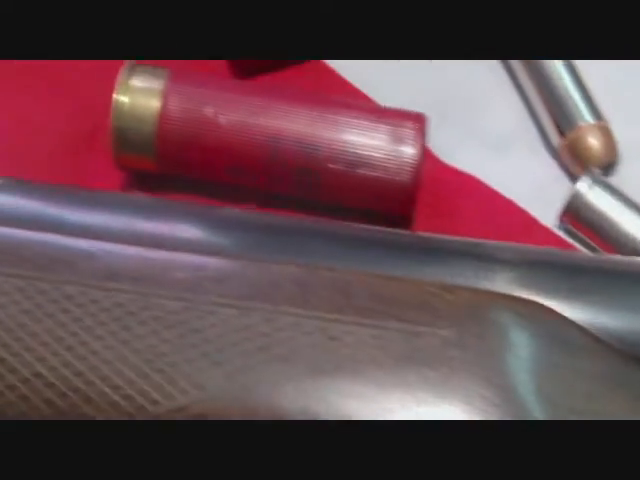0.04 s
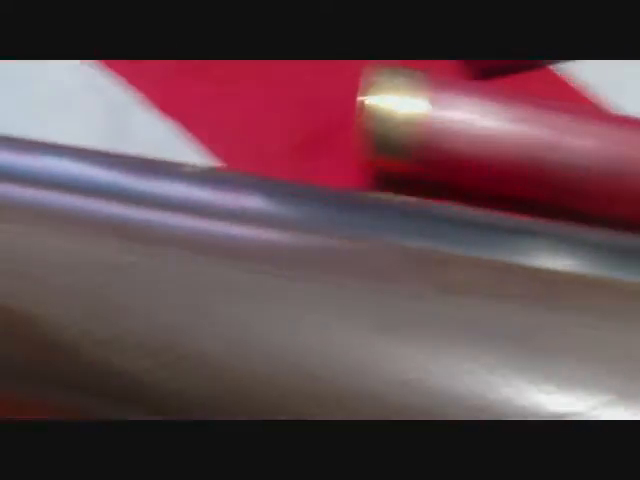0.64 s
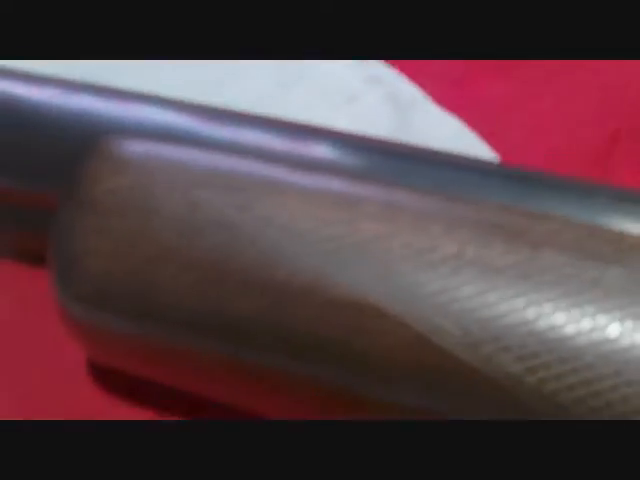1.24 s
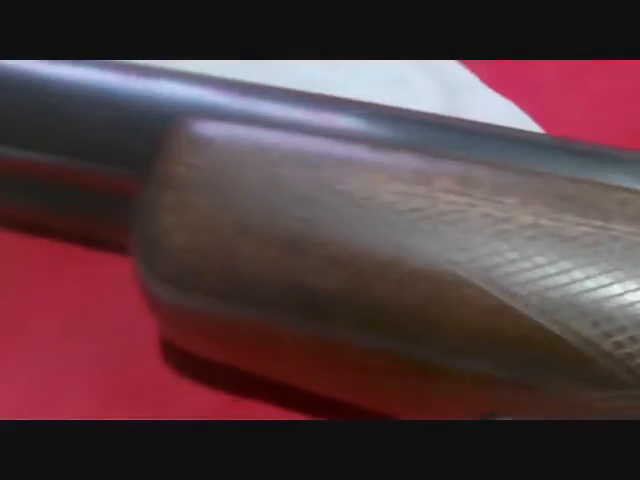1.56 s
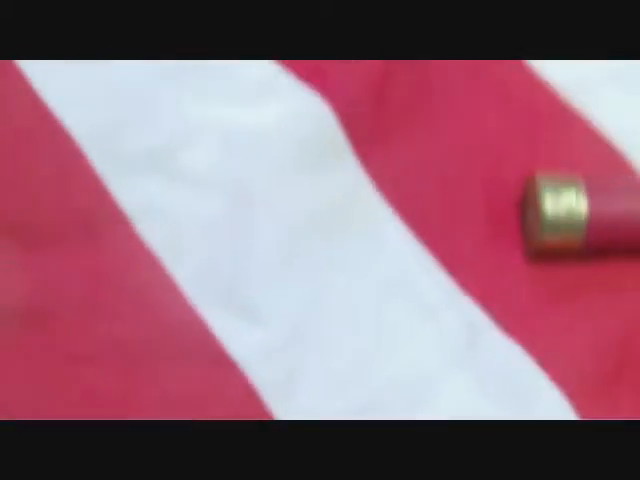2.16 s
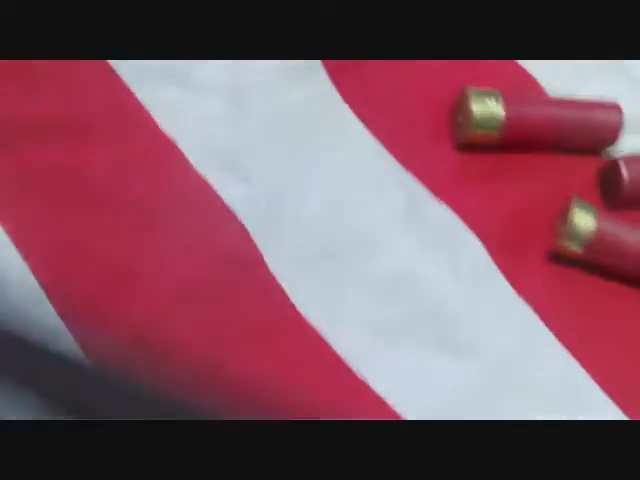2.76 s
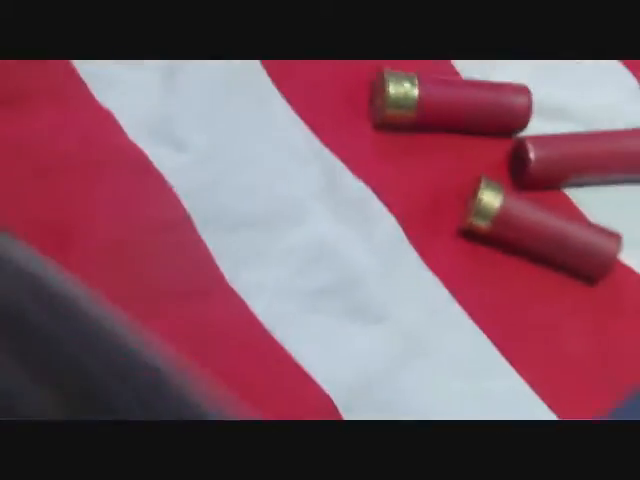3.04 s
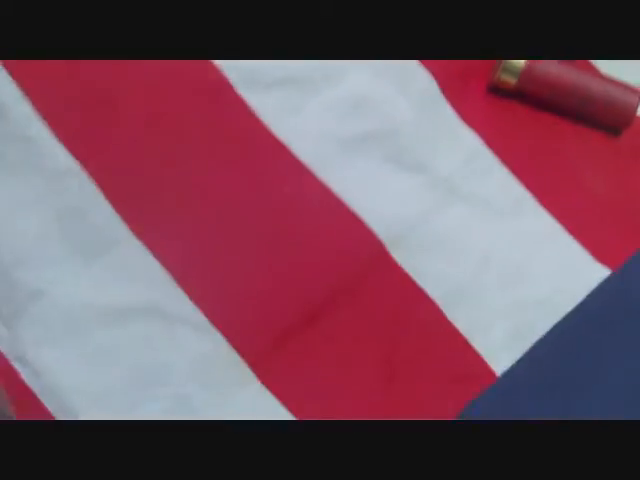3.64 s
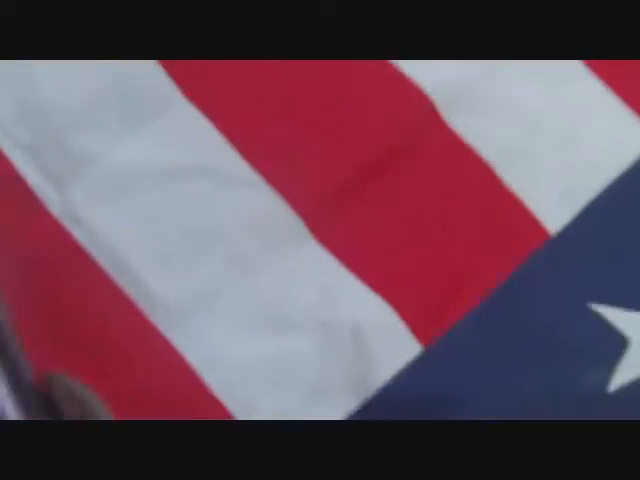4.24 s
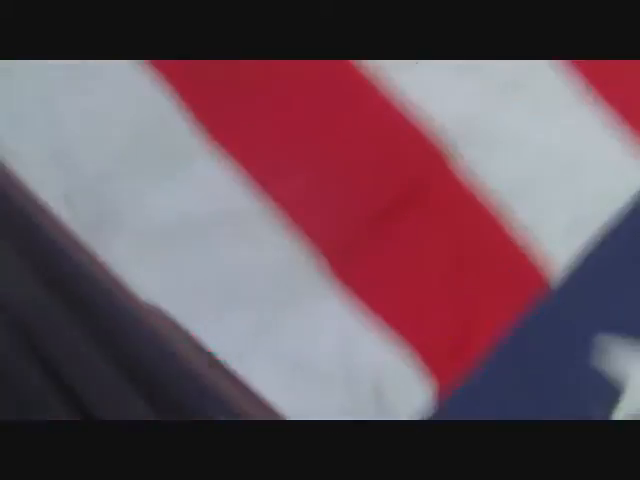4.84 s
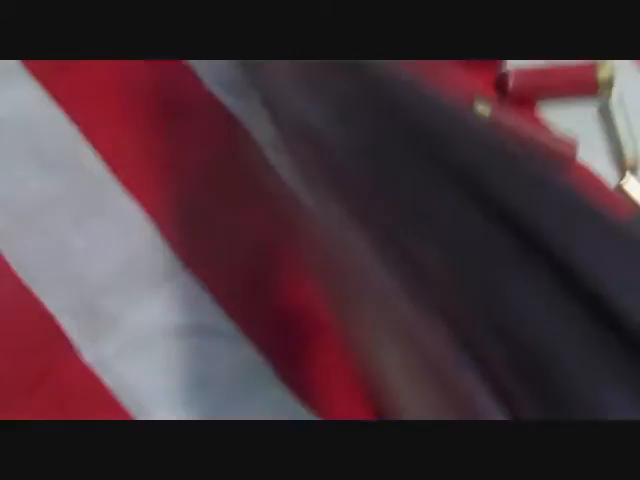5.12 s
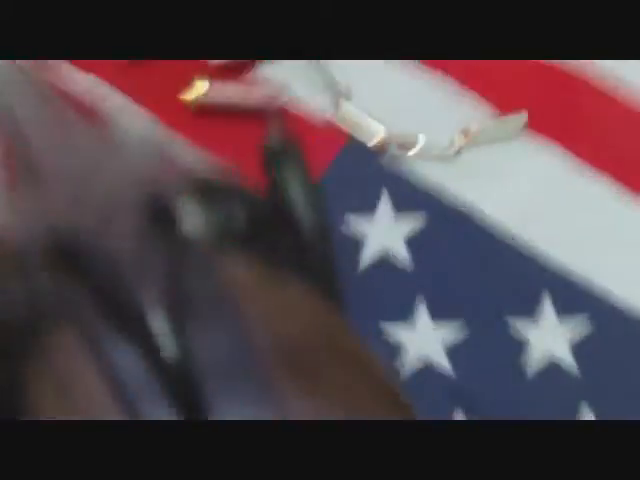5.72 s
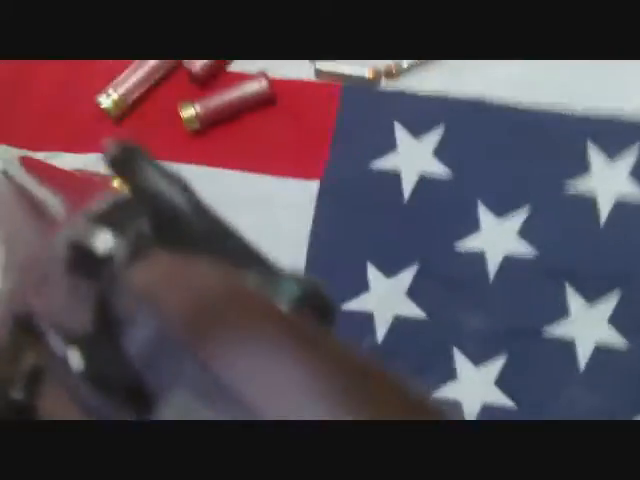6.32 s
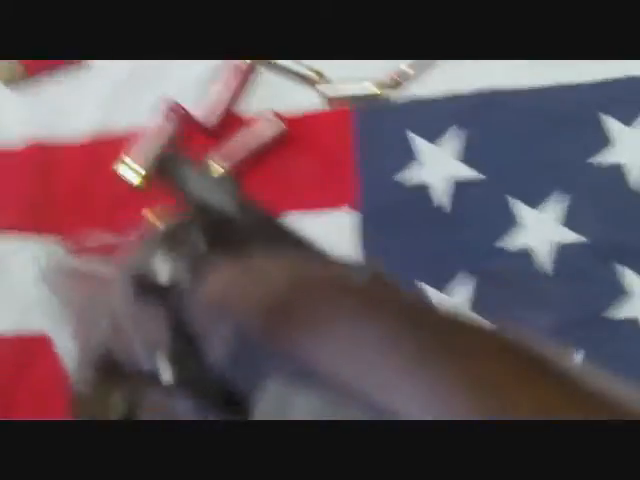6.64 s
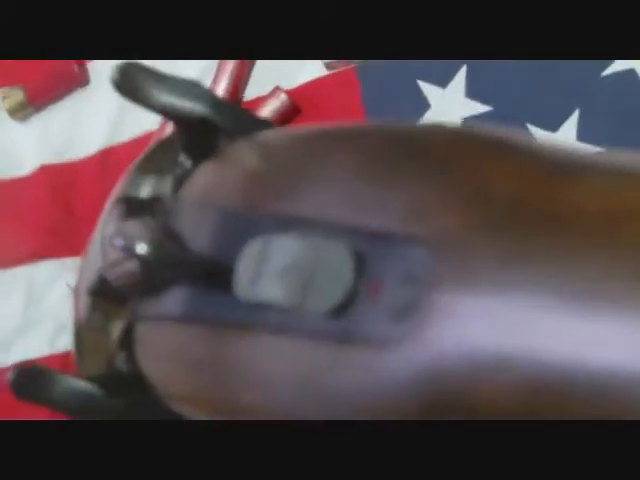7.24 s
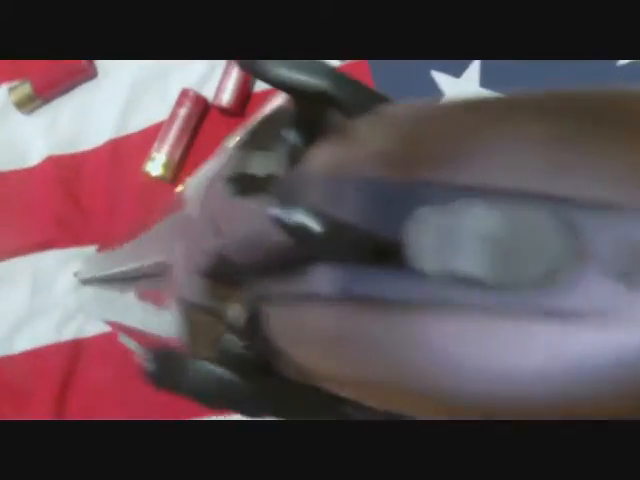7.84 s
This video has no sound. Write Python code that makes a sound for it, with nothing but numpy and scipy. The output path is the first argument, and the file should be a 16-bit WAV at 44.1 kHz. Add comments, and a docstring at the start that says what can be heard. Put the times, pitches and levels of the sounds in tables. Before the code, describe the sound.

A faint steady hiss runs throughout in a small, quiet room. Close to the microphone, hands and sleeves rub softly over a double-barrel shotgun and cloth, briefly near 0.7 seconds and more often from 1.6 seconds. At 2.2 seconds a spring catch snaps with a thin, bright click, followed by light finger ticks. At about 3.4 seconds the action opens with a loud, sharp clunk, trailed by a few small clicks. Metal knocks start again around 4.2 seconds and build to the loudest moment near 4.4 seconds, a quick cluster of clacks with a short steel grind and slight thump as the gun shuts. The barrels ring faintly, with little room echo. Another sharp click comes at 5 seconds, then lighter knocks and taps until about 6 seconds. Only faint rubbing and a couple of tiny ticks remain, up to about 8 seconds.

```python
"""A steady hiss fills a small quiet room, and hands and sleeves rub softly over wood and cloth.
A double-barrel shotgun is being turned over close by, above a cloth-covered table. Fingers tick on it,
a sprung catch snaps, and the action clunks open and, a second later, clacks shut with a grind of steel.
Each impact of the action or of loose parts excites a crack and the gun's hand-damped modes, and the
barrels ring on faintly. The table and walls add quick reflections and a weak reverberant tail."""
import sys
import numpy as np
from scipy import signal
from scipy.fft import rfft, irfft
from scipy.io import wavfile
from scipy.ndimage import uniform_filter1d, minimum_filter1d

SR = 44100
rng = np.random.default_rng(int(sys.argv[2]) if len(sys.argv) > 2 else 0)


def generate_wav(signal):
    """Clip the signal to [-1, 1] and save it as 16-bit WAV at the path in sys.argv[1]."""
    frames = np.transpose(np.atleast_2d(signal))
    scaled = np.clip(frames, -1, 1) * 32767
    pcm = np.round(scaled).astype(np.int16)
    wavfile.write(sys.argv[1], SR, pcm)


N = 351918

# spectral density of the background hiss: f/Hz, level/dB
BACKGROUND_SPECTRUM = [(30, -37), (90, -33), (150, -19.5), (230, -13), (430, -5.5), (620, -3), (1230, -5.5),
                       (2200, -9.5), (3500, -13.5), (4800, -16.5), (7000, -21), (8200, -22.5),
                       (12000, -24.5), (15500, -29)]
# reverberation time of the room: f/Hz, t60/s
REVERB_TIMES = [(100, .45), (700, .42), (2500, .33), (6000, 0.52), (13000, .24)]
# spectral density of skin and cloth rubbing: f/Hz, level/dB
RUB_SPECTRUM = [(150, -32), (400, -4), (800, -1.5), (1600, -2), (2250, -2.5), (2530, 2.5), (2850, -4),
                (4000, -5), (6000, -13.5), (10000, -49)]
# spectral density of the fibres' hiss: f/Hz, level/dB
FIBRE_SPECTRUM = [(1500, -31.5), (3500, -5.5), (5000, -3.5), (6700, 0), (8000, -2.5), (10000, -3.5),
                  (12500, -8.5), (15000, -16)]
# strokes of hands and sleeves: middle t/s, half length/s, rub level/dB, fibre level/dB
HAND_STROKES = [(0.68, 0.068, -63, -68.5), (1.62, 0.049, -58.5, -70), (1.76, 0.16, -59, -65),
                (2.076, 0.064, -57.5, -62), (2.24, 0.1, -63, -62), (2.45, 0.12, -65.5, -71),
                (2.84, 0.07, -56, -57), (3.084, 0.1, -69.5, -66), (3.297, 0.046, -54.5, -56.5),
                (3.622, 0.008, -62, -41), (3.66, 0.09, -64.5, -66), (3.84, 0.035, -63, -67),
                (5.362, 0.049, -57.5, -68), (6.227, 0.09, -68.5, -75.5), (6.53, .09, -65.5, -84),
                (7.874, 0.065, -66.5, -89.5)]
# dry taps under the fingers: t/s, level over 10 ms/dB, centre f/Hz, gain an octave either side/dB
FINGER_TICKS = [(1.317, -61, 705, -30), (2.310, -50, 880, -6.5), (2.3214, -57.5, 774, -13.5),
                (2.676, -56.5, 2500, -10), (2.791, -51.5, 1800, -27), (4.346, -47, 1398, -10.5),
                (5.233, -46, 1210, -12.5), (5.356, -50, 1157, -19), (5.7171, -44.5, 2170, -5),
                (5.724, -42, 977, -7), (5.756, -50.5, 1125, -6.5), (5.804, -52, 2960, -8),
                (5.914, -50, 3780, -1), (5.917, -68.5, 171, -16), (6.871, -67.5, 4900, -18.5),
                (7.918, -66, 6000, -14.5)]
# modes of the catch: f/Hz, level/dB, t60/s
CATCH_RESONANCES = [(2007, 2.5, 0.059), (2490, 4, .025), (3504, 6, 0.023), (4020, -0.5, 0.009),
                    (4880, -9, 0.017), (5840, -1, 0.015), (9200, -5, 0.0081), (13100, -15, .006)]
# lightly damped modes of the barrels: f/Hz, level/dB, t60/s
BARREL_RESONANCES = [(1200, 4.5, .25), (1540, -3.5, .3), (1750, -6, .3), (2280, -2.5, 0.2), (2970, 0, .25),
                     (3000, 1, .22), (3440, 2, 0.2), (4730, -15, .2), (5690, -5, .25), (7287, -2, .2),
                     (10920, -1, .22)]
# modes of the whole gun, damped by the hands: f/Hz, level/dB, t60/s
GUN_RESONANCES = [(1329, -2, 0.038), (1479, -0.5, 0.041), (1830, -2.5, 0.013), (2144, 0.5, 0.012),
                  (2281, -4, 0.049), (2380, -0.5, 0.027), (2815, 0, 0.017), (3017, -4, .035),
                  (3417, 0, 0.023), (4700, -6, .06), (6030, -7.5, 0.08), (6487, -6, .05), (7100, -7, 0.057),
                  (11250, -7.5, .03)]
# spectral density common to knocks and slides: f/Hz, level/dB
CONTACT_SPECTRUM = [(80, -45), (200, -33.5), (450, -11), (900, -6.5), (1400, -3.5), (2400, -3.5),
                    (3400, -9), (4500, -14.5), (6500, -13.5), (8300, -22), (11500, -18.5), (15500, -34.5)]
# steel sliding on steel in the action: start t/s, length/s, level/dB, treble gain/dB
STEEL_SLIDES = [(3.34, .008, -39.5, -0.5), (3.364, 0.014, -30.5, -3.5), (4.166, .01, -39.5, -10),
                (4.226, 0.011, -32.5, -11), (4.385, .03, -15.5, 5.5), (4.487, 0.0033, -27.5, -11.5),
                (4.521, 0.0028, -43.5, -6)]
# knocks of steel and wood: t/s, level over 10 ms/dB, brightness/dB, rebound delay/s
IMPACTS = [(1.7488, -49.5, -12, .007), (3.2756, -40, 8.5, .007), (3.3372, -20.5, -13, .003),
           (3.3469, -31, 4.5, .003), (3.37, -5.5, -5.5, .01), (3.4154, -30, -7.5, .004),
           (3.5507, -48.5, -19, .003), (3.589, -49, 7, .003), (3.6148, -39.5, 8, .004),
           (3.635, -30.5, 2, .0072), (3.6957, -33, -16, .0163), (3.7928, -52.5, -21, .003),
           (4.1566, -37.5, -1.5, .0098), (4.172, -26, -7, .005), (4.2278, -24.5, -4, .004),
           (4.237, -18, -11.5, .004), (4.256, -22.5, 6, .0055), (4.367, -38, -6.5, .003),
           (4.378, -23.5, 3, .004), (4.3875, -10, 7.5, .004), (4.3995, -6, 3, .005),
           (4.415, -12.5, 1.5, .004), (4.4353, -18, -8, .003), (4.452, -9, -1, .0075),
           (4.4931, -20, -2.5, .004), (4.5195, -17, -1.5, .0085), (4.5714, -27.5, 4, .003),
           (4.6709, -51, -11, .003), (4.7225, -40, -19.5, .0139), (4.8165, -33, 1, .003),
           (4.9228, -44, -21, .006), (5.0422, -24, 7.5, .0143), (5.245, -36.5, -12.5, .003),
           (5.419, -45, -22, .003), (5.5084, -34, -2, .003), (5.6239, -43, -24.5, .027)]


def undb(db):
    """Amplitude ratio of a level in decibels."""
    return 10 ** (np.asarray(db) / 20)


def unit(x):
    """Normalisation to an energy of 1."""
    return x / np.sqrt(np.sum(x ** 2))


def on_log(hz, points):
    """Interpolation of (f/Hz, value) points on a logarithmic frequency axis."""
    f, value = np.transpose(points)
    return np.interp(np.log(np.maximum(hz, 1)), np.log(f), value)


def colour(x, points, size=2048):
    """Minimum-phase filtering by a curve of (f/Hz, gain/dB) points."""
    hz = np.arange(size // 2 + 1) * SR / size
    cepstrum = irfft(np.log(undb(on_log(hz, points))))
    cepstrum[1:size // 2] *= 2
    cepstrum[size // 2 + 1:] = 0
    return signal.fftconvolve(x, irfft(np.exp(rfft(cepstrum))))[:len(x)]


def fade(t, t60):
    """Exponential decay, 60 dB down at t60."""
    return np.exp(-np.log(1000) * t / t60)


def swell(middle, half, t):
    """Gaussian envelope, down to 1/e at a half length from its middle."""
    return np.exp(-np.minimum(((t - middle) / half) ** 2, 50))


def push(start, length, t60, attack_s=.0025):
    """Envelope of a slide: exponential rise, plateau and exponential decay."""
    t = np.arange(N) / SR - start
    return np.exp(np.minimum(t, 0) / attack_s) * fade(np.maximum(t - length, 0), t60)


def ring(modes, t):
    """Superposition of damped modes; each level sets that mode's share of the energy."""
    return unit(sum(undb(db) * unit(np.sin(2 * np.pi * hz * t) * fade(t, t60)) for hz, db, t60 in modes))


def add(track, s, sound, db):
    """Superposition of a sound at time s, with the energy of 10 ms at the given level."""
    start = int(s * SR)
    part = (unit(sound) * undb(db) * np.sqrt(SR / 100))[:N - start]
    track[start:start + len(part)] += part


def walk(rate):
    """Slow random fluctuation: straight lines between Gaussian values, rate of them a second."""
    step = max(int(SR / rate), 1)
    return 0.8 * uniform_filter1d(np.repeat(rng.standard_normal(N // step + 1), step), step)[:N]


def noise(points, grit_db=0):
    """Filtered noise of rms 1; grit modulates it at random into unequal grains."""
    grains = rng.standard_normal(N) * undb(grit_db * np.minimum(rng.exponential(size=N), 3))
    return unit(colour(grains, points)) * np.sqrt(N)


def background(hiss_db=-66.5, sway_db=-1.14, whine_hz=11880, whine_width_hz=160, whine_db=-88):
    """Noise floor: broadband hiss of room and microphone, with a narrow-band electronic whine."""
    resonance = signal.iirpeak(whine_hz, whine_hz / whine_width_hz, fs=SR)
    whine = signal.lfilter(*resonance, rng.standard_normal(N))
    hiss = noise(BACKGROUND_SPECTRUM) * undb(hiss_db + sway_db * walk(3.2))
    return hiss + undb(whine_db) * unit(whine) * np.sqrt(N)


def room(x, early_db=-15, early_t60=.1, tail_db=-22, first_s=0.0035):
    """Reverberation: early reflections from table and walls, then a tail decaying band by band."""
    t = np.arange(SR // 2) / SR
    edges = np.concatenate([[0], np.geomspace(200, SR / 2, num=8)])
    spectrum = rfft(rng.standard_normal(len(t)))
    hz = np.arange(len(spectrum)) * SR / len(t)
    tail = np.zeros(len(t))
    for lo, hi in zip(edges, edges[1:]):
        band = irfft(spectrum * (hz >= lo) * (hz < hi), len(t))
        tail += band * fade(t, on_log((lo + hi) / 2, REVERB_TIMES))
    early = rng.standard_normal(len(t)) ** 3 * fade(t, early_t60)  # cubing makes single echoes stand out
    arrived = t > first_s
    response = undb(early_db) * unit(early * arrived) + undb(tail_db) * unit(tail * arrived)
    response = colour(response, [(200, 6.5), (1000, 1.5), (3000, -6.5), (10000, 1.5)])
    return signal.fftconvolve(x, response)[:N]


def rubbing(grit_db=4.0, flutter_db=2.76, body_db=-8, dull_hz=2000, scrape_db=3.5, slip_lag_s=.035):
    """Friction noise: skin and cloth rub, fibres hiss, and both weakly excite the gun's modes."""
    # the hands slip after each knock, and the grip shifts all the while; columns as in HAND_STROKES
    slips = [(s + slip_lag_s, .04, -63, -73.5) for s, *_ in IMPACTS]
    grip = (4.3, 2.5, -67, -77.5)
    t = np.linspace(0, N / SR, num=4000)
    power = sum(np.outer(undb([db, fibre_db]), swell(s, half, t)) ** 2
                for s, half, db, fibre_db in HAND_STROKES + slips + [grip])
    press, speed = (np.interp(np.arange(N) / SR, t, np.sqrt(row)) for row in power)
    rub, fibres = noise(RUB_SPECTRUM, grit_db), noise(FIBRE_SPECTRUM, grit_db)
    dull = signal.sosfiltfilt(signal.butter(2, dull_hz, fs=SR, output="sos"), rub)
    scrape = undb(scrape_db) * np.sqrt(press * speed) * (rub - dull)  # weak in slow strokes
    strokes = press * dull + scrape + speed * fibres
    body = signal.fftconvolve(strokes, ring(GUN_RESONANCES, np.arange(SR // 10) / SR))[:N]
    body = undb(body_db) * unit(body) * np.linalg.norm(strokes)
    return (strokes + body) * undb(flutter_db * walk(60))


def ticks(t60=0.0077):
    """Light impacts, too weak to ring the gun: noise bursts with one broad spectral hump."""
    out, t = np.zeros(N), np.arange(2048) / SR
    for s, db, hz, skirt_db in FINGER_TICKS:
        hump = [(hz / 16, 5 * skirt_db - 20), (hz / 2, skirt_db), (hz, 0),
                (hz * 2, skirt_db), (hz * 8, 4 * skirt_db)]
        add(out, s, colour(rng.standard_normal(len(t)) * fade(t, t60), hump), db)
    return colour(out, [(7000, -0.5), (15000, -5)])


def catch(s=2.2203, db=-26.5, crack_db=-14, crack_t60=0.014, lowest_hz=1720):
    """Radiation from a small body: a spring throws a steel part against its stop, giving no bass."""
    out, t = np.zeros(N), np.arange(4000) / SR
    burst = rng.standard_normal(len(t)) * fade(t, crack_t60)
    crack = unit(colour(burst, [(9000, 8), (15000, -20)]))
    snap = ring(CATCH_RESONANCES, t) + undb(crack_db) * crack
    radiation = signal.butter(8, lowest_hz, "high", fs=SR, output="sos")
    add(out, s, signal.sosfilt(radiation, snap), db)
    return out


def thump(s=4.392, db=-36, t60=0.2):
    """Momentum transfer: the barrels come home and jolt the whole gun into a weak low thump."""
    out, t = np.zeros(N), np.arange(SR // 2) / SR
    spectrum = [(20, -14.5), (45, -8), (95, -15.5), (160, -6),
                (205, -10), (280, 2.5), (500, -6.5), (2000, -69.5)]
    add(out, s, colour(rng.standard_normal(len(t)) * fade(t, t60), spectrum), db)
    return out


def barrels(action, ring_db=-33.5):
    """Resonance: the steel tubes, driven by knocks and slides, ring on faintly."""
    response = ring(BARREL_RESONANCES, np.arange(SR // 2) / SR)
    return undb(ring_db) * signal.fftconvolve(action, response)[:N]


def sliding(grit_db=3, split_hz=4000, body_t60=0.16, treble_t60=.1):
    """Stick-slip friction: hinge and locking faces grind in tiny slips; the treble dies first."""
    grind = noise(CONTACT_SPECTRUM, grit_db)
    body = signal.sosfilt(signal.butter(2, split_hz, fs=SR, output="sos"), grind)
    # inverted, so that the two bands add in phase
    treble = -signal.sosfilt(signal.butter(2, split_hz, "high", fs=SR, output="sos"), grind)
    out = np.zeros(N)
    for s, length, db, treble_db in STEEL_SLIDES:
        out += undb(db) * push(s, length, body_t60) * body
        out += undb(db + treble_db) * push(s, length, treble_t60) * treble
    return out


def knock(force_db, bright_db, lead_s, rise_s=0.0009, chatter_s=.002, crack_t60=0.018, modes_db=-3):
    """Impact excitation: a contact builds, strikes and chatters, driving a crack and the gun's modes."""
    t = np.arange(5000) / SR
    after = np.maximum(t - lead_s, 0)
    build = np.exp(np.minimum(t - lead_s, 0) / rise_s)
    chatter, scatter = rng.standard_normal((2, len(t)))
    # the grip detunes the modes a little, and the spot that is struck weights them
    modes = [(hz * (1 + 0.009 * rng.normal()), db + 2 * rng.normal(), t60)
             for hz, db, t60 in GUN_RESONANCES]
    force = unit(chatter * build * np.exp(-after / chatter_s))
    force[int(lead_s * SR)] += undb(-3)  # the blow itself is one impulse
    ringing = unit(signal.fftconvolve(force, ring(modes, t))[:len(t)])
    crack = unit(scatter * build * fade(after, crack_t60 + 2 * chatter_s))
    blow = colour(crack + undb(modes_db) * ringing, CONTACT_SPECTRUM)
    thud_db = 2.5 - .42 * force_db  # light knocks thud like wood
    edge_db = 7.5 + .7 * bright_db - .22 * force_db  # the edge of steel, masked in heavy blows
    top_db = bright_db - 19 + 0.35 * force_db  # only heavy blows reach the very top
    return colour(blow, [(150, -7.5), (550, thud_db), (1200, 0), (2100, -1),
                         (2900, edge_db), (3600, edge_db), (5600, bright_db), (14000, top_db)])


def knocks(middling_db=-29, lead_s=.003):
    """Inelastic collision: parts strike, spring back and land once more, weaker and duller."""
    out = np.zeros(N)
    for s, db, bright_db, rebound_s in IMPACTS:
        force_db = db - middling_db
        rebound_db = db - 9 - 0.1 * force_db  # harder blows lose more
        add(out, s - lead_s, knock(force_db, bright_db, lead_s), db)
        add(out, s + rebound_s - lead_s, knock(force_db, bright_db - 5, lead_s), rebound_db)
    return out


def scene():
    """Superposition of the gun's direct sound, its reflections, the rubbing and the noise floor."""
    action = knocks() + sliding()
    gun = action + barrels(action) + thump() + catch() + ticks()
    return (gun + room(gun) + rubbing() + background())[None]


def record(dry, ceiling=0.85, hold_s=0.0018, bass_cut_hz=24, top_hz=15250):
    """Peak and band limiting: the gain dips at the loudest peaks, then bass and top are cut."""
    hold = int(hold_s * SR)
    needed_gain = ceiling / np.maximum(np.abs(dry), ceiling)
    gain = uniform_filter1d(minimum_filter1d(needed_gain, hold), hold)
    thin = signal.sosfilt(signal.butter(1, bass_cut_hz, "high", fs=SR, output="sos"), dry * gain)
    return signal.sosfilt(signal.ellip(8, .2, 70, top_hz, fs=SR, output="sos"), thin)


dry = scene()
out = record(dry)
generate_wav(out)
```